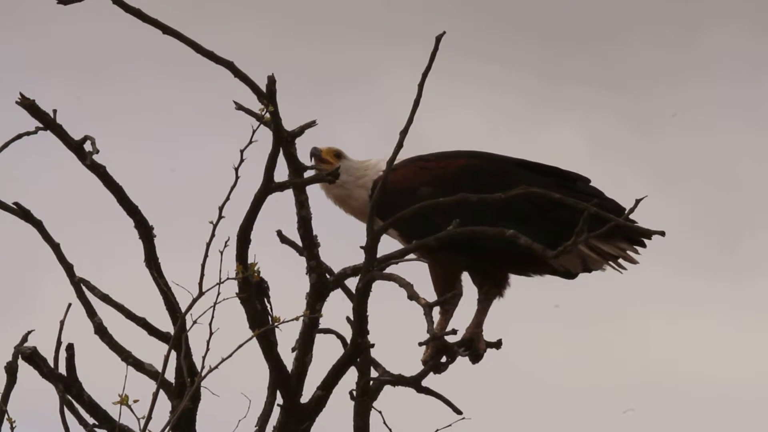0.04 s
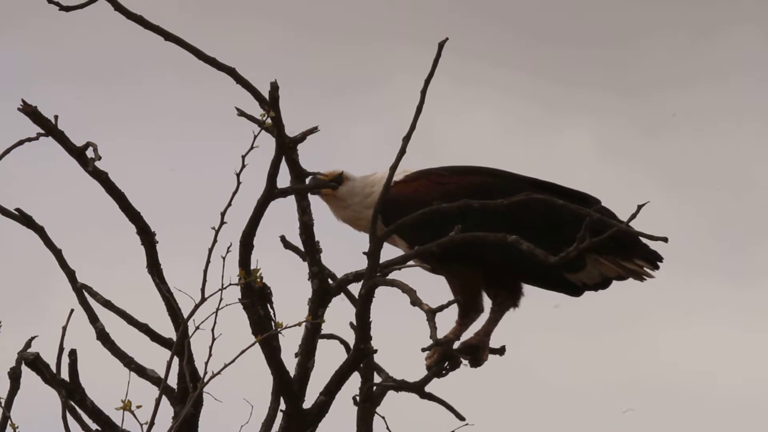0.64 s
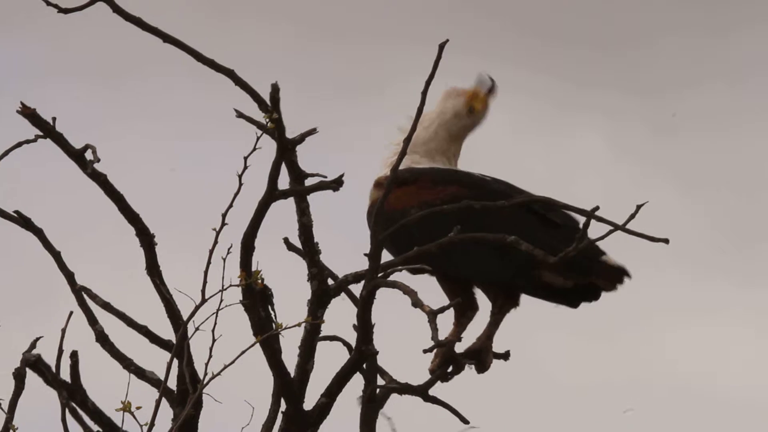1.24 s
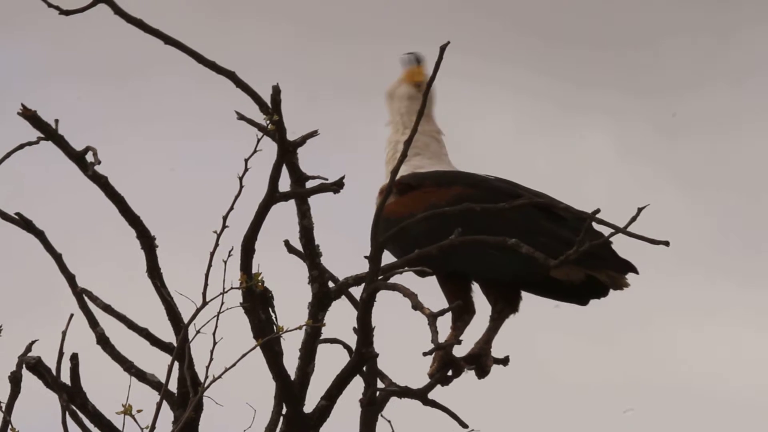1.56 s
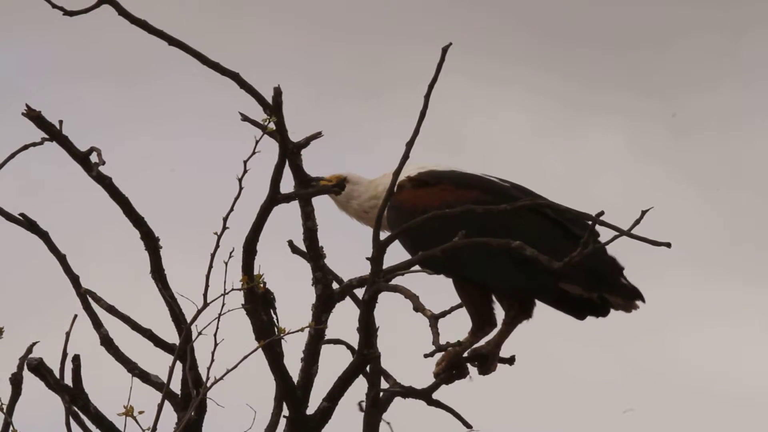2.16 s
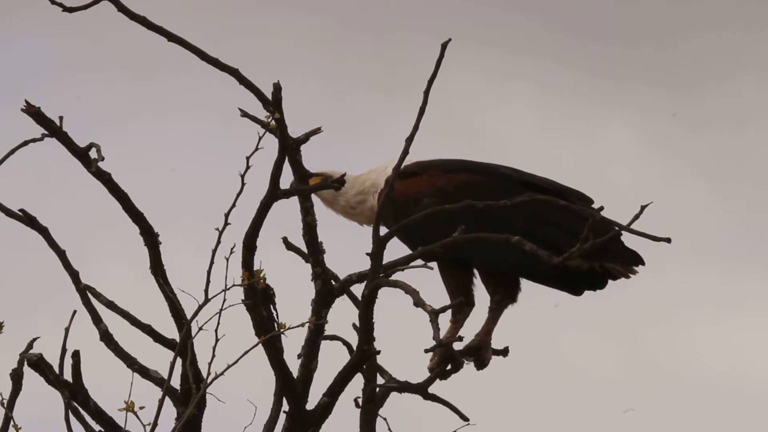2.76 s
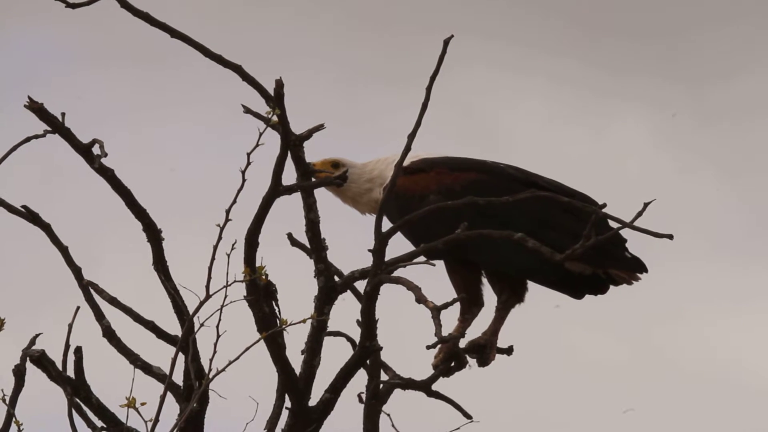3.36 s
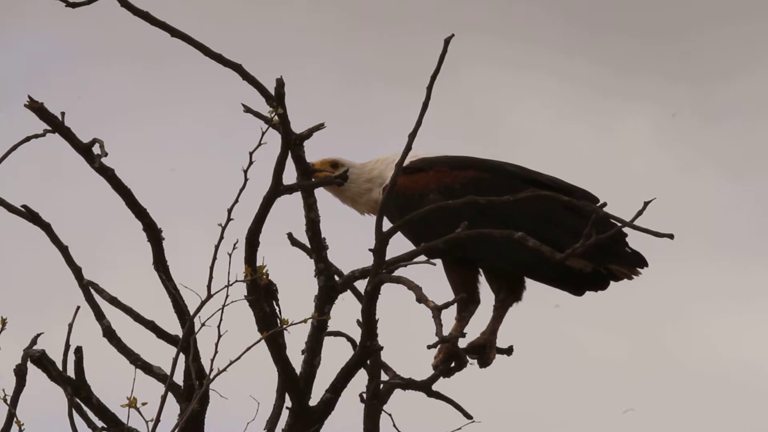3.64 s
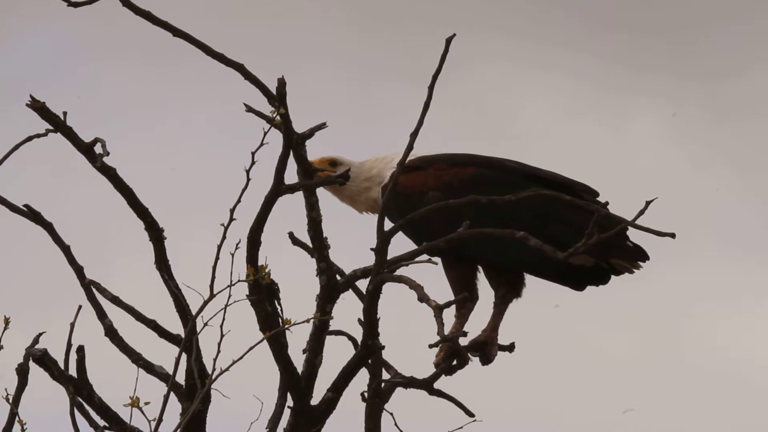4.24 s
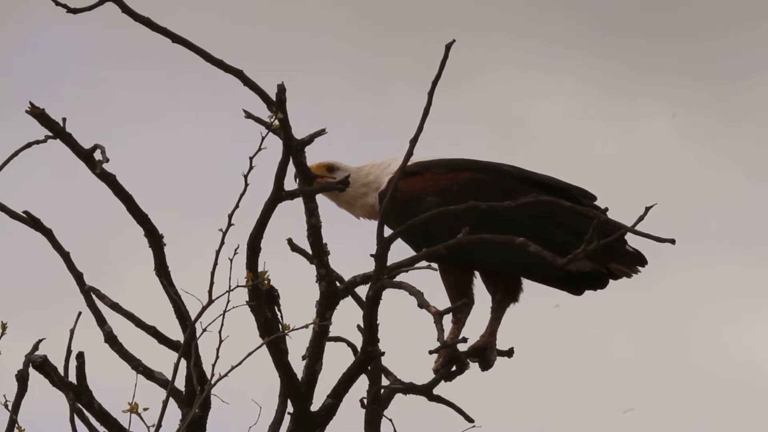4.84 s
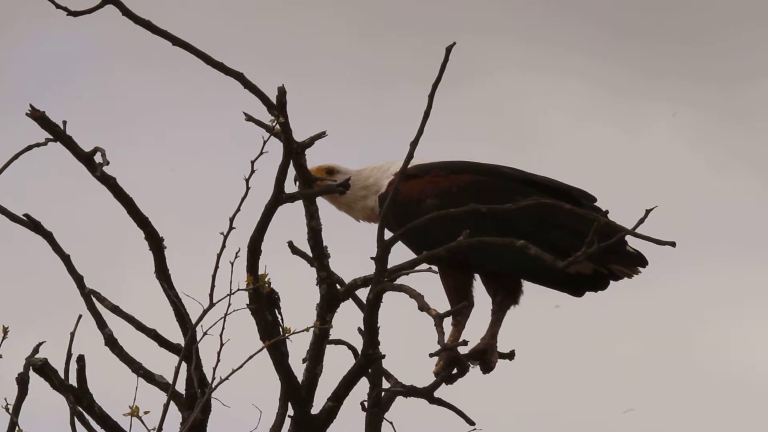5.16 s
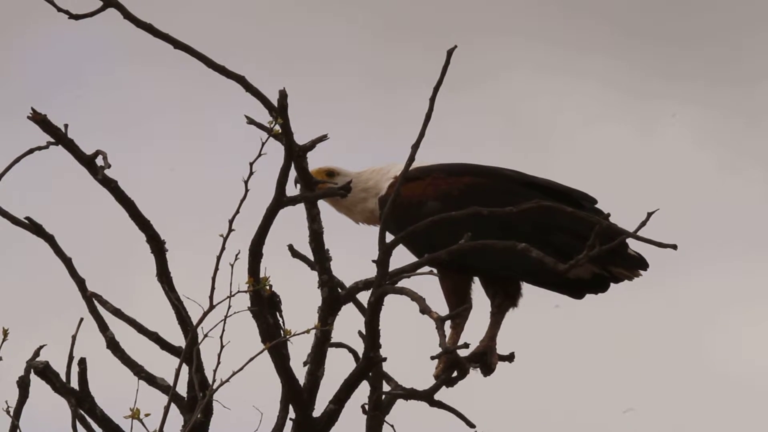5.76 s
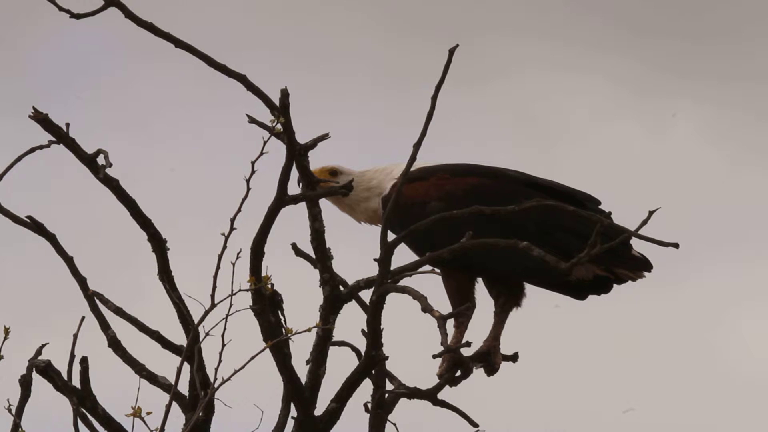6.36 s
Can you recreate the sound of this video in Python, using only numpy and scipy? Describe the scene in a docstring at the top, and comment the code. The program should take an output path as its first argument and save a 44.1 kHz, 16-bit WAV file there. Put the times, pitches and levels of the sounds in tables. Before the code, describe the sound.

A fish eagle screams, then gives a falling run of ringing yelps outdoors; a second eagle answers from further off over faint wind.

```python
"""A fish eagle on a dead tree screams, then gives a falling run of yelps; a second answers further off.
Each note is a harmonic series, driven by the syrinx and filtered by throat and beak. It rasps where
the oscillation turns irregular and sometimes breaks into a higher register; thin squeaks lie between.
Ground and trees reflect the calls. Behind them are a few dry knocks, small birds, a faint hum and
light wind, which now and then buffets the microphone."""
import sys
import numpy as np
from scipy import signal
from scipy.fft import rfft, irfft
from scipy.io import wavfile
from scipy.ndimage import uniform_filter1d, map_coordinates

SR = 44100
rng = np.random.default_rng(int(sys.argv[2]) if len(sys.argv) > 2 else 0)


def waveform_to_disk(signal):
    """Save audio, clipped to [-1, 1], as 16-bit WAV at the path in sys.argv[1]."""
    frames = np.transpose(np.atleast_2d(signal))
    scaled = np.clip(frames, -1, 1) * 32767
    samples = np.round(scaled).astype(np.int16)
    wavfile.write(sys.argv[1], SR, samples)


N = 286209
TIME = np.arange(N) / SR

# Spectrum of distant rustling air: frequency_hz, relative_density_db
AIR_SPECTRUM = [(59, -50), (100, -15), (169, -13.5), (196, -4.5), (223, -11.5), (394, -1), (564, -6),
                (742, -0.5), (936, -15.5), (1310, -17), (1430, -16), (2270, -21.5), (3460, -21.5),
                (12300, -30.5), (15500, -36)]
# Spectrum of wind on the microphone: frequency_hz, relative_density_db
BUFFET_SPECTRUM = [(15, -8.5), (50, 1), (95, 1), (140, -8), (220, -17.5), (500, -61)]
# Breeze between the gusts: time_s, level_db
BREEZE_LEVELS = [(0, -39.5), (.15, -57.5), (.8, -60), (1.4, -71), (1.75, -60), (2.7, -64.5), (3.2, -57),
                 (3.65, -61.5), (3.8, -68.5), (6.49, -68)]
# Gusts on the microphone: peak_s, level_db, decay_s
GUSTS = [(2.021, -36, 0.0318), (2.233, -40.5, 0.0237), (2.37, -38.5, 0.079), (2.555, -34.5, 0.0157),
         (3.03, -38.5, 0.0202), (3.135, -45, 0.0253), (4.281, -39, 0.0526)]
# Reverberation of the trees in octave bands: centre_hz, relative_level_db, t60_s
TREE_REVERB = [(701, -28, 0.51), (1534, -7.5, 2.025), (3200, -12.5, 1.4), (5600, -1.5, 0.72),
               (9600, 2.5, 0.65)]
# Dry knocks: start_s, level_db, centre_hz, decay_s
KNOCKS = [(0.204, -46.5, 1480, 0.0019), (0.57, -37, 312, 0.037), (2.563, -38, 1194, 0.0014),
          (3.537, -49, 1460, 0.00557), (3.604, -57, 1497, 0.0026)]
# Squeaks between notes: start_s, end_s, start_hz, middle_hz, end_hz, level_db, relative_octave_db,
# roughness
SQUEAKS = [(0.433, 0.482, 3580, 3100, 2730, -50, -24.5, 0.65),
           (0.535, 0.611, 2660, 2893, 2720, -46, -25, 0.42),
           (0.582, .64, 3996, 3570, 3198, -47.5, -29.5, 0.87),
           (0.729, 0.79, 3460, 3200, 2982, -49.5, -22.5, 1.09),
           (1.005, 1.089, 4888, 6200, 5440, -47, -3.5, 0.61),
           (1.044, 1.092, 5030, 5130, 5420, -41.5, -11.5, 0.12),
           (1.381, 1.439, 5200, 4830, 4923, -37, -14.5, .35),
           (1.724, 1.791, 4400, 4360, 4187, -45, -15, 0.6),
           (1.808, 1.867, 6700, 6300, 5600, -58, -25.5, 0.13),
           (5.65, 5.733, 2046, 1965, 2040, -59, -31.5, 0.1),
           (3.476, 3.537, 4600, 4440, 4260, -68.5, -25.5, 0.42),
           (3.98, 4.053, 3440, 3530, 3480, -67, -25, .3), (6.42, 6.503, 4440, 4676, 4746, -48.5, -42, 1.11)]
# Filter of the throat and open beak: frequency_hz, gain_db
THROAT_RESPONSE = [(600, 1), (2400, 0), (5200, 1), (6400, 1.5), (7400, .5), (8600, -3.5), (10000, -2),
                   (11400, 2.5), (12700, 1), (14000, 4), (14900, -3), (15600, -20.5)]
# Long cries of the far and near eagle: time_s, pitch_hz, fundamental_db, octave_db,
# middle_db (harmonics 3-5), top_db (harmonics 6-13)
FAR_CRY = [(5.41, 980, -69.5, -84, -65.5, -74.5), (5.426, 1010, -51, -57, -73.5, -77),
           (5.452, 1107, -65.5, -64, -74, -78), (5.488, 1165, -28, -38.5, -56, -73),
           (5.512, 1220, -28, -51, -42.5, -70.5), (5.59, 1298, -32, -34.5, -58.5, -60),
           (5.626, 1300, -30, -38.5, -43, -60.5), (5.682, 1313, -39, -38, -42.5, -60.5),
           (5.754, 1285, -29, -36.5, -52, -62), (5.804, 1270, -28, -50.5, -44, -68),
           (5.832, 1168, -26, -37, -63.5, -74.5), (5.85, 1155, -33.5, -60.5, -58.5, -69.5)]
NEAR_CRY = [(0.0, 1184, -11.5, -27.5, -25.5, -30), (0.034, 1240, -24, -29, -24, -23.5),
            (0.058, 1259, -8.5, -29, -19.5, -27), (0.126, 1270, -12, -30.5, -31, -28),
            (0.178, 1258, -13, -33, -25, -35), (0.232, 1246, -19, -26.5, -24.5, -37),
            (0.25, 1239, -34, -29, -28, -32.5), (0.322, 1224, -17, -25, -26, -37.5),
            (0.366, 1195, -13, -24.5, -26, -38), (0.38, 1115, -14, -48.5, -28.5, -35),
            (0.386, 1066, -6, -36, -37, -41), (0.392, 1015, -12, -60.5, -40.5, -42.5),
            (0.398, 879.3, -18.5, -29.5, -40.5, -53.5), (0.405, 808.4, -35, -55, -50, -51)]
# Yelps, a row for each or for each piece of a cracked one: start_s, length_s, crest_share (of length),
# start_hz, crest_hz, end_hz, fundamental_db, octave_db, middle_db, top_db, roughness, ring_after_s,
# ring_s, ring_db, choke_db, gape_ratio (beak resonance over pitch at the crest)
FAR_YELPS = [(1.127, 0.1154, 0.92, 1336, 1484, 1500, -28.5, -49.5, -48.5, -79, 0.104, 0.0692, 0.0276, 3.9, 3.5, 3.27),
             (1.22, 0.289, 0.402, 1220, 1239, 978, -23, -39, -46, -58, 0.0343, 0.022, 0.16, 2, -2, 3.486),
             (6.29, 0.0371, 0.702, 851, 959.8, 958.0, -57.5, -31, -56, -69.5, 0.71, 0.028, 0.0093, 5.9, 1.5, 3.1),
             (6.315, 0.108, 0.256, 1185, 1239.0, 1016, -28, -34.5, -36.5, -51.5, 0.095, 0.0647, 0.0057, 9.57, -1.5, 3.713),
             (6.409, 0.066, 0.038, 1390, 1392.0, 1057, -36, -51, -58.5, -80.5, 0.34, 0.0028, 0.0295, 4.1, -11.5, 4.64)]
NEAR_YELPS = [(0.822, 0.02523, 0.792, 719.1, 909.4, 881.0, -29, -23.5, -32.5, -43, 0.76, 0, 0.0088, 2, 7.5, 3.1),
              (0.838, 0.0968, 0.617, 980.4, 1239, 1140, -14, -18.5, -19.5, -28, 0.01, 0.081, 0.0135, 6, -5.5, 3.45),
              (0.931, 0.0403, 0.11, 1330, 1386, 1272, -11.5, -32, -38.5, -48.5, 0.06, 0.0027, 0.0144, 5.5, 3.5, 3.15),
              (1.074, 0.0984, 0.76, 979, 1216, 1077, -21.5, -52.5, -43, -51.5, 0.15, 0.0906, 0.0107, 10, -13.5, 3.3),
              (1.172, 0.024, 0.07, 988.5, 962.5, 732.6, -23, -43.5, -35.5, -43, 0.55, 0.00044, 0.00937, 9, 1.5, 3.1),
              (1.296, 0.1163, 0.499, 571, 1085, 1017, -22, -47, -42, -48.5, 0.07, 0.0297, 0.0486, 9.5, -2.5, 3.65),
              (1.396, 0.0784, 0.456, 1028, 1007, 1133, -20, -39.5, -45, -44, 0, 0.0023, 0.0253, -4, -14, 4.3),
              (1.462, 0.0638, 0.587, 1090, 1189, 988.4, -30, -62.5, -41.5, -50, 0.13, 0.0, 0.0055, 14, -14, 3.0),
              (1.52, 0.02316, 0.0676, 882.6, 894.2, 721.4, -26, -47, -53, -43.5, 0.83, 0.014, 0.0084, 5.5, -0.0, 3.4),
              (1.643, 0.0991, 0.77, 575.4, 1019, 921, -25, -56.5, -47, -57, 0, 0.0471, 0.0457, 8.5, 1, 3.0),
              (1.764, 0.0452, 0.324, 1032, 993, 919, -35.5, -66.5, -47.5, -61, 0.42, 0.005, 0.0168, 9.5, -3, 4.3),
              (1.791, 0.0966, 0.157, 924.3, 943, 609.8, -27, -63.5, -56.5, -57.5, 0.05, 0.0037, 0.0296, 4, -13, 3.3),
              (1.908, 0.1357, 0.386, 897.3, 1211, 1045, -36, -33.5, -41.5, -59, 0.14, 0.0134, 0.105, 8, -10.5, 3.6),
              (2.027, 0.044, 0.035, 1450, 1430, 1145, -31.0, -44, -45, -88, 0.32, 0.0233, 0.026, 2.5, 3.5, 3.4),
              (2.098, 0.1142, 0.502, 1076, 1245, 905.4, -33.5, -55, -62, -86, 0.19, 0.0443, 0.035, 4, 0.5, 3.45),
              (2.314, 0.1493, 0.773, 1036, 1162, 942, -31.5, -43.5, -60.5, -91, 0.16, 0.0641, 0.04, 10, -15.5, 3.3),
              (2.575, 0.0289, 1, 753.3, 911, 890, -36, -46, -67.5, -79, 0.53, 0.073, 0.0087, 4.0, 0.0, 3.4),
              (2.601, 0.1325, 0.291, 1123, 1107, 981, -36, -39.5, -57, -76.5, 0.18, 0.0773, 0.047, 7.5, -3.5, 3.45),
              (2.897, 0.1706, 0.61, 855, 949.5, 817, -40.5, -51, -67, -84.5, 0.2, 0.097, 0.0573, 4, -0.5, 3.3)]


def undb(db):
    """The decibel law: amplitude grows tenfold every 20 dB."""
    return 10 ** (np.asarray(db) / 20)


def unit(x):
    """Normalisation to rms 1."""
    return x / np.sqrt(np.mean(x ** 2))


def shares_db(power):
    """Power addition: each harmonic's share of the total, in dB."""
    return 10 * np.log10(power / power.sum(axis=0))


def spectrum_at(hz, points):
    """Interpolation of a spectrum in dB over log frequency."""
    frequency_hz, db = np.transpose(points)
    return np.interp(np.log(hz + 1), np.log(frequency_hz), db)


def coloured(points):
    """Spectral shaping of white noise, at rms 1."""
    gain = undb(spectrum_at(np.fft.rfftfreq(N, 1 / SR), points))
    return unit(irfft(rfft(rng.standard_normal(N)) * gain, N))


def band(size, lo_hz, hi_hz):
    """Band-pass filtering of white noise, at rms 1."""
    sos = signal.butter(2, [lo_hz, min(hi_hz, .45 * SR)], "band", fs=SR, output="sos")
    return unit(signal.sosfilt(sos, rng.standard_normal(size)))


def wander(t, per_s):
    """Random modulation: a smooth curve through per_s values a second."""
    return .85 * map_coordinates(rng.standard_normal(2048), [(t - t[0]) * per_s], order=3, mode="mirror")


def fade(t, rise_s, fall_s):
    """Amplitude envelope with quarter-sine ends."""
    rise = np.sin(np.pi / 2 * np.clip((t - t[0]) / rise_s, 0, 1))
    fall = np.sin(np.pi / 2 * np.clip((t[-1] - t) / fall_s, 0, 1))
    return rise * fall


def phase_of(hz):
    """Phase is the time integral of frequency."""
    return 2 * np.pi * np.cumsum(hz) / SR


def distant_air():
    """Broadband noise under slow amplitude modulation: air rustling far off."""
    return coloured(AIR_SPECTRUM) * undb(-50 + .5 * wander(TIME, 1.524))


def hum():
    """A faint pure tone, weakly modulated in amplitude and frequency."""
    amplitude = np.sqrt(2) * undb(-64.5 + 2 * wander(TIME, 9.6))
    return amplitude * np.sin(phase_of(203.4 + 1.36 * wander(TIME, 3.6)))


def wind_buffet(eddy_db=4, gust_rise_s=.00414):
    """Turbulence: eddies and gusts press on the microphone as low-frequency noise."""
    breeze = undb(np.interp(TIME, *np.transpose(BREEZE_LEVELS)) + eddy_db * wander(TIME, 22))
    gusts = sum(undb(db) * np.exp(-np.maximum((peak_s - TIME) / gust_rise_s, (TIME - peak_s) / decay_s))
                for peak_s, db, decay_s in GUSTS)
    return coloured(BUFFET_SPECTRUM) * (breeze + gusts)


def small_birds(count=110, level_db=-66, centre_hz=3050):
    """Frequency modulation: each distant chirp is a short, wavering glide."""
    out = np.zeros(N)
    t = TIME[:SR // 16]
    for when, pitch, glide in rng.random((count, 3)):
        octaves = .7 * (pitch - .5) + .4 * (glide - .6) * t / t[-1] + .06 * wander(t, 700)
        chirp = np.hanning(len(t)) * np.sin(phase_of(centre_hz * 2 ** octaves))
        start = int(when * (N - len(t)))
        out[start:start + len(t)] += undb(level_db) * chirp
    return out


def woodland(direct, echo_s, echo_db, twigs_db, twigs_t60_s, trees_db):
    """Multipath propagation: direct sound, ground reflection, scatter from twigs, tree reverberation."""
    t = TIME[:2 * SR]
    trees = sum(undb(db - 60 * t / t60_s) * band(len(t), hz / np.sqrt(2), hz * np.sqrt(2))
                * np.sqrt(hz / SR) for hz, db, t60_s in TREE_REVERB)
    trees = trees * np.clip(t / .011, 0, 1) / np.sqrt(SR / 20)
    twigs = undb(-60 * t / twigs_t60_s) * np.clip(t / .0502, 0, 1) * band(len(t), 450, 5300)
    response = undb(trees_db) * trees + undb(twigs_db) * twigs / np.sqrt(np.sum(twigs ** 2))
    ground = undb(echo_db) * np.interp(TIME - echo_s, TIME, direct, left=0)
    return direct + ground + signal.fftconvolve(direct, response)[:N]


def absorption(sound, cutoff_hz=10000):
    """Absorption by air and foliage dulls a distant call."""
    return signal.sosfilt(signal.butter(2, cutoff_hz, fs=SR, output="sos"), sound)


def knocks():
    """Damped transients: noise bursts that decay exponentially, heard as dull ticks."""
    return sum(undb(db) * (TIME >= start_s) * np.exp(-np.abs(TIME - start_s) / decay_s)
               * band(N, hz / 3, hz * 3) for start_s, db, hz, decay_s in KNOCKS)


def squeaks():
    """Frequency jitter roughens thin whistles, each a tone and its octave on a parabola of pitch."""
    out = np.zeros(N)
    for start_s, end_s, *arc_hz, db, octave_db, rough in SQUEAKS:
        index = np.arange(int(start_s * SR), min(int(end_s * SR), N))
        t = TIME[index]
        hz = np.polyval(np.polyfit([0, .5, 1], arc_hz, 2), np.linspace(0, 1, len(t)))
        phase = phase_of(hz * (1 + .085 * rough * wander(t, 1300)))
        whistle = np.sin(phase) + undb(octave_db) * np.sin(2 * phase)
        out[index] += np.sqrt(2) * undb(db) * fade(t, .0074, .0135) * whistle
    return out


def slackness(hz):
    """A slack syrinx vibrates more slowly: the share by which pitch lies below its maximum."""
    return 1 - hz / hz.max()


def bend(away_s, span_s, tight_s):
    """A catenary: flat and 0 at the crest, steepening to 1 a span away."""
    return (np.cosh(np.maximum(away_s, 0) / tight_s) - 1) / (np.cosh(span_s / tight_s) - 1)


def yelp(start_s, length_s, crest_share, start_hz, crest_hz, end_hz, fundamental_db, octave_db,
         middle_db, top_db, rough, ring_after_s, ring_s, ring_db, choke_db, gape_ratio):
    """Modulation contours of a yelp: a wavering arch of pitch whose fundamental chokes, then rings."""
    t = TIME[int(start_s * SR):int((start_s + length_s) * SR)]
    age_s = t - start_s
    crest_s = length_s * np.clip(crest_share, .02, .98)
    scoop_hz = (start_hz - crest_hz) * bend(crest_s - age_s, crest_s, tight_s=.033)
    drop_hz = (end_hz - crest_hz) * bend(age_s - crest_s, length_s - crest_s, tight_s=.038)
    hz = crest_hz + scoop_hz + drop_hz
    slack = slackness(hz)

    snap_s, choke_lead_s, choke_width_s, wavers_per_s = .00183, .01475, .01804, 64.6
    ring_age_s = age_s - ring_after_s
    ringing = .5 * (np.tanh(ring_age_s / snap_s) - np.tanh((ring_age_s - ring_s) / snap_s))
    choked = np.exp(-.5 * ((ring_age_s + choke_lead_s) / choke_width_s) ** 2)
    edge_db = -13.5 * (np.exp(-age_s / .005) + np.exp((age_s - length_s) / .00244))  # attack, release
    waver_db = 2.4042 * wander(t, wavers_per_s)
    bloom_db = -4.5 * ((2 * age_s / length_s - 1) ** 2 - .2)  # greatest in mid-yelp
    # Slack shifts the balance from the fundamental to the octave.
    fundamental_db += edge_db + ring_db * ringing + choke_db * choked - 2 * slack + waver_db
    octave_db += edge_db + 13.5 * slack + .17 * ring_db * (ringing - ringing.mean())
    upper_db = edge_db + 1.5 * slack + bloom_db
    hz = hz * (1 + .033 * rough * wander(t, wavers_per_s))

    # The voice roughens as it catches and lets go, and frays past the crest.
    breaking = np.exp(-np.minimum(age_s, length_s - age_s) / .00622)
    fraying = np.clip((age_s - crest_s) / (length_s - crest_s), 0, 1) ** 2
    rough += .303 * breaking + .126 * fraying
    return t, hz, fundamental_db, octave_db, middle_db + upper_db, top_db + upper_db, rough, gape_ratio


def long_cry(rows, rough, gape_ratio):
    """Modulation contours of a long cry: the highest harmonics fade as the pitch drops."""
    t = TIME[int(rows[0][0] * SR):int(rows[-1][0] * SR)]
    time_s, *columns = np.transpose(rows)
    contours = (uniform_filter1d(np.interp(t, time_s, column), size=180) for column in columns)
    hz, fundamental_db, octave_db, middle_db, top_db = contours
    return t, hz, fundamental_db, octave_db, middle_db, top_db - 29.5 * slackness(hz), rough, gape_ratio


def beak_resonance(harmonic, hz, gape_ratio, shut_ratio=3.148, width_hz=320):
    """Power response of a resonator: the beak gapes at the crest and closes as the voice slackens."""
    resonance_hz = hz * (shut_ratio + (gape_ratio - shut_ratio) * np.exp(-slackness(hz) / .06))
    return 1 / (1 + (2 * (harmonic * hz - resonance_hz) / width_hz) ** 2)


def syrinx(t, hz, fundamental_db, octave_db, middle_db, top_db, rough, gape_ratio,
           jitter, shimmer, rasp_db, soft_slope_db):
    """Source and filter: a harmonic note shaped by throat and beak, irregular in its cycles if rough."""
    rough = np.clip(rough + (slackness(hz) / .4005) ** 1.785, 0, 1)  # a slack syrinx is rougher
    phase = phase_of(hz * (1 + jitter * rough * wander(t, 900) + .001 * wander(t, 90)))
    middle, top = np.arange(3, 6)[:, None], np.arange(6, 14)[:, None]
    # A hard-blown note keeps its highest harmonics; a soft one loses them.
    slope_db = soft_slope_db * np.clip((-32 - top_db) / 18, 0, 1)
    harmonics_db = [fundamental_db, octave_db,
                    *(middle_db + shares_db(beak_resonance(middle, hz, gape_ratio))),
                    *(top_db + shares_db(undb(-slope_db * np.log2(top)) ** 2))]
    bloom = fade(t, .012, .018)  # upper harmonics build up last and die first
    voice = 0
    for k, level_db in enumerate(harmonics_db, 1):
        # The overtones stagger more than the fundamental.
        stagger = rough * (.5 if k == 1 else 1) + .04 * min(k - 1, 4) * np.clip(slope_db / 20, 0, 1)
        flutter = (1 + shimmer * stagger * wander(t, 500)) * undb(1.2 * min(k - 1, 2) * wander(t, 50))
        amplitude = undb(level_db + spectrum_at(k * hz, THROAT_RESPONSE))
        voice += amplitude * flutter * bloom ** ((k - 1) / 4) * np.sin(k * phase)
    # Air escapes once a cycle, and a very rough note breaks up into noise.
    hiss = undb(rasp_db + middle_db) * band(len(t), 1100, 9100)
    crack = rough ** 2 * undb(octave_db) * band(len(t), 900, 3000)
    rasp = rough * (1 + np.cos(phase)) * (bloom * hiss + fade(t, .016, .002) * crack)
    return (np.sqrt(2 - rough ** 2) * voice + rasp) * fade(t, .0015, .003)


def eagle(cry, yelps, **voice):
    """Radiation from a small source: one bird's cry and yelps leave its throat without bass."""
    out = np.zeros(N)
    for t, *contours in [cry, *(yelp(*row) for row in yelps)]:
        out[np.rint(t * SR).astype(int)] += syrinx(t, *contours, **voice)
    return signal.sosfilt(signal.butter(2, 350, "high", fs=SR, output="sos"), out)


def scene():
    """Superposition: two eagles in open woodland over a quiet background."""
    near = eagle(long_cry(NEAR_CRY, rough=.0232, gape_ratio=3.543), NEAR_YELPS,
                 jitter=.0636, shimmer=.945, rasp_db=-5, soft_slope_db=26.5)
    near += squeaks() + knocks()
    far = eagle(long_cry(FAR_CRY, rough=.0153, gape_ratio=4.015), FAR_YELPS,
                jitter=.14, shimmer=.878, rasp_db=-16, soft_slope_db=16)
    far = absorption(far)
    near = woodland(near, echo_s=.02, echo_db=-20, twigs_db=-25, twigs_t60_s=.199, trees_db=-14.5)
    far = woodland(far, echo_s=.038, echo_db=-18.5, twigs_db=-21, twigs_t60_s=.255, trees_db=-20)
    return (near + far + small_birds() + distant_air() + hum() + wind_buffet())[None]


def record(dry):
    """Band limiting: a steep low-pass filter cuts the treble above 15.6 kHz."""
    return signal.sosfilt(signal.ellip(10, .2, 80, 15600, fs=SR, output="sos"), dry)


dry = scene()
out = record(dry)
waveform_to_disk(out)
```